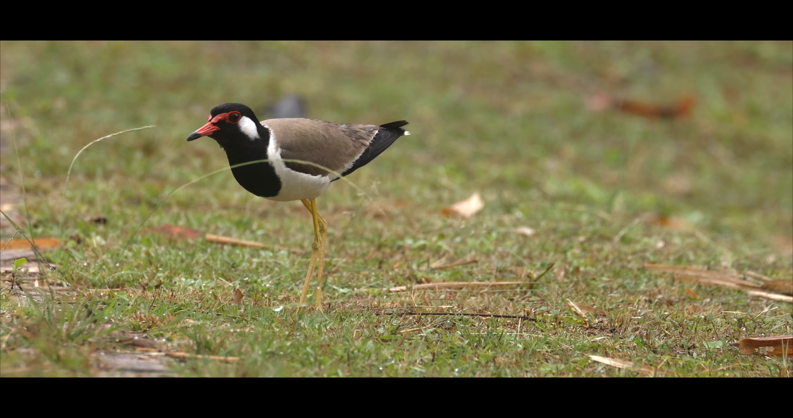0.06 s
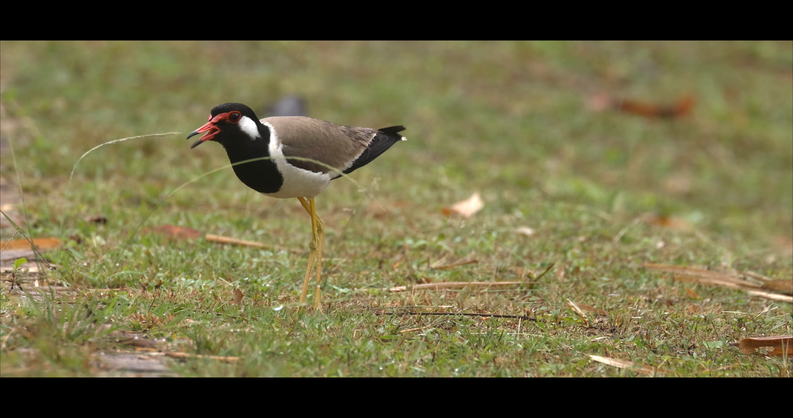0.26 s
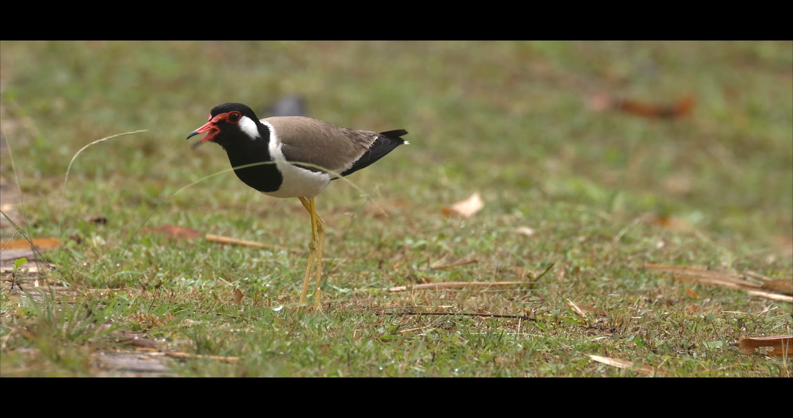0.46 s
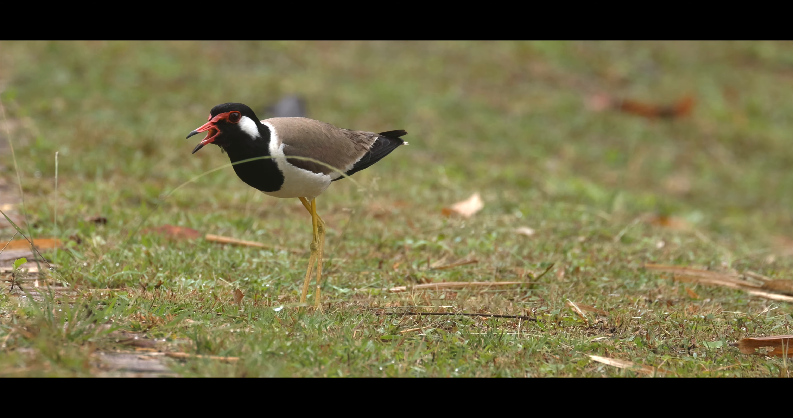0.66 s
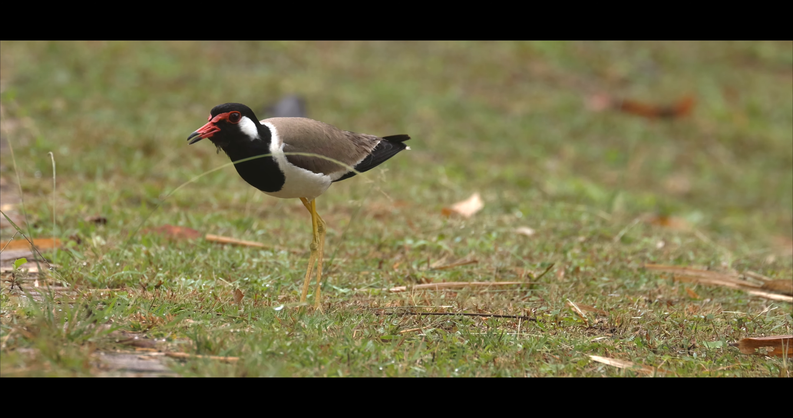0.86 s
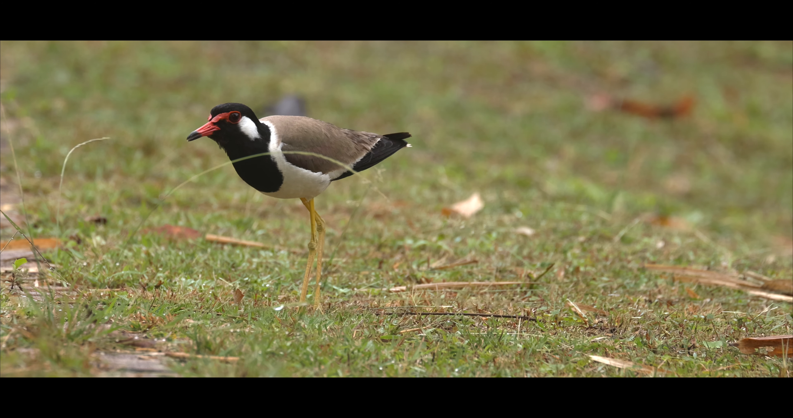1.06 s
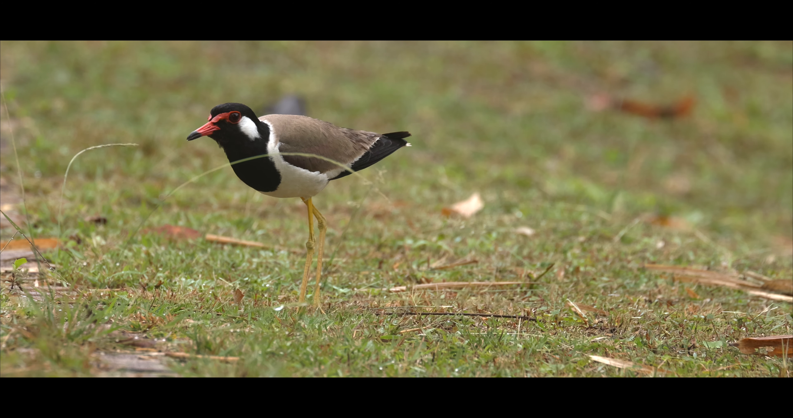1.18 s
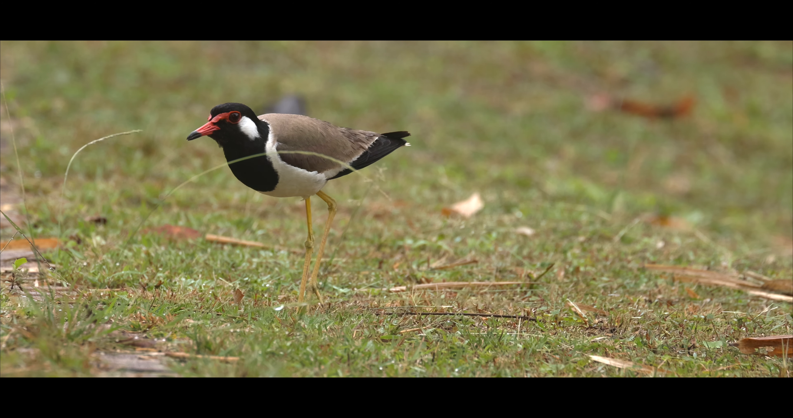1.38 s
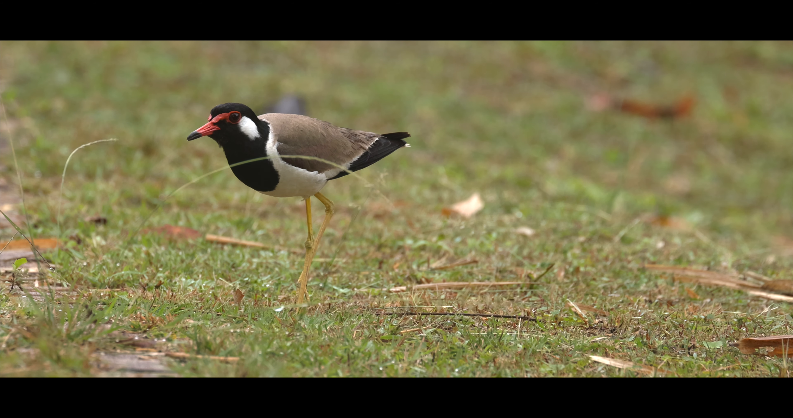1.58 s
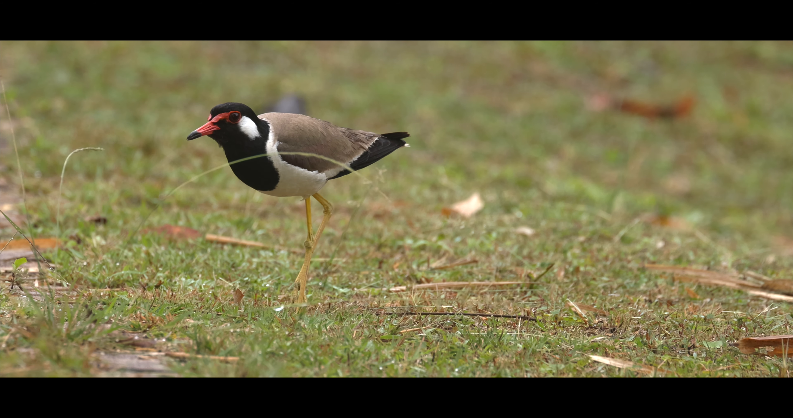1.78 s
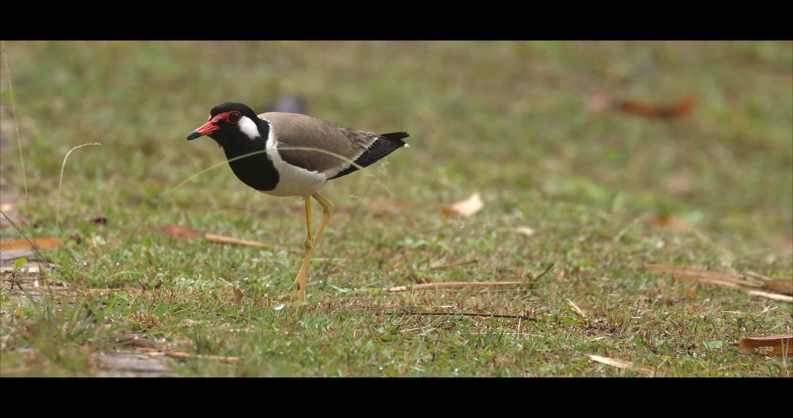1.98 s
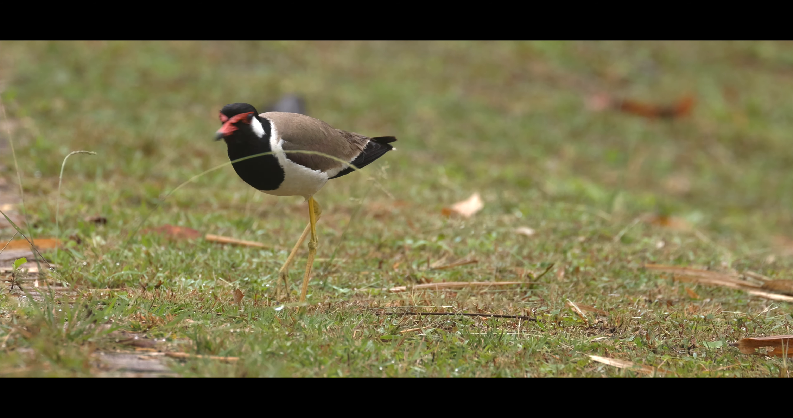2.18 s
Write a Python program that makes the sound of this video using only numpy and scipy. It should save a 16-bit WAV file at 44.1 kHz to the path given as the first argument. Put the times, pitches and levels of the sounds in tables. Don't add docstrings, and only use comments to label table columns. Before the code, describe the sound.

Lapwing alarm cries, sharp and raspy, from a near and a farther bird on a lawn

```python
import sys
import numpy as np
from scipy import signal
from scipy.fft import rfft, irfft
from scipy.io import wavfile
from scipy.ndimage import uniform_filter1d

SR = 44100
rng = np.random.default_rng(int(sys.argv[2]) if len(sys.argv) > 2 else 0)


def volts_from_db(level):
    exponent = np.asarray(level, float) / 20
    return 10 ** exponent


def file_out(sig):
    cols = np.atleast_2d(sig).T
    lim = np.clip(cols, -1, 1)
    pcm = np.round(lim * 32767).astype(np.int16)
    wavfile.write(sys.argv[1], SR, pcm)


N = 99225
LEAD = SR // 3
TIME = (np.arange(N + LEAD) - LEAD) / SR

# (time [s], pitch [Hz], level [dB], brightness [dB per octave])
NEAR_CHIPS = [
    [(.502, 1387, -31.5, 4), (.512, 1433, -25.5, 1.5), (.524, 1450, -23, 0.5), (.538, 1388, -25, 2.5),
     (.55, 1228, -33, 7.5), (.561, 1125, -37.5, 6)],
    [(.849, 1416, -27, -1), (.866, 1483, -24.5, 1.5), (.88, 1437, -24.5, -1.5), (.892, 1313, -29.5, 2.5),
     (.904, 1184, -32, 3)],
]
NEAR_SOFT_CRY = [
    (1.24, 1264, -36.5, -1.5),
    (1.254, 1259, -37.5, -2.5),
    (1.259, 1215, -37, -1),
]
NEAR_TRILL_END = [
    (1.4497, 1375, -22.5, 0.0066),
    (1.455, 1391, -23, .01),
    (1.466, 1387, -23.5, 0.027),
    (1.48, 1346, -22.5, 0.014),
    (1.487, 1270, -29.5, 0),
]
NEAR_LONG_CRY = [
    (1.653, 1336, -22, -1),
    (1.698, 1360, -22, -2),
    (1.736, 1363, -22, -1.5),
    (1.762, 1325, -22.5, -1.5),
    (1.773, 1302, -28.5, -0.5),
    (1.807, 1178, -25, -6.5),
    (1.84, 1028, -29, -24),
    (1.86, 996, -37, -6),
    (1.893, 1030, -34.5, -10),
]
NEAR_UPTURN = [
    (1.896, 1191, -41, -6),
    (1.899, 1217, -36, -10),
    (1.925, 1350, -36, -1.5),
    (1.948, 1582, -34.5, .1),
    (1.954, 1567, -37, 0),
    (1.96, 1390, -57, -10),
]
# (time [s], length [s], pitch [Hz], level [dB])
NEAR_STUTTER_PULSES = [(1.2113, 0.0094, 1309, -35.5), (1.2277, .011, 1320, -34),
                       (1.3527, 0.0037, 1300, -28.5), (1.3664, 0.01, 1354, -24.5),
                       (1.3833, 0.01, 1374, -22.5), (1.4003, 0.012, 1376, -22.5),
                       (1.4179, 0.011, 1389, -21), (1.4352, 0.012, 1390, -21),
                       (1.5877, 0.0058, 1272, -33.5), (1.6035, 0.013, 1332, -24.5),
                       (1.6205, 0.012, 1354, -23.5), (1.6374, 0.011, 1354, -21)]
NEAR_FULL_VOICE = [-25.5, -2.5, -7, -7.5, -15, -27, -32.5, -31.5, -33, -37, -31.5]
NEAR_CHIP_VOICE = [
    [-25, 1, -2.5, -7, -10, -27, -32, -29, -36, -30, -25],
    [-20, -5, -6, -11, -17, -30, -36, -32, -33, -29, -26],
]
NEAR_SOFT_VOICE = [-16.5, 0.5, 4, 0, -8, -24, -28, -25, -22.5, -28, -26.5]
NEAR_UPTURN_VOICE = [
    [-8, .1, -4, -30, -40, -35, -39, -23, -37, -32, -46],
    [-14.5, 0.095, -13, -31, -34, -42, -42, -24, -34, -33, -40],
]


def near_lapwing():
    pulses = [pulse(*p) for p in NEAR_STUTTER_PULSES]
    soft = pulses[:2] + [NEAR_SOFT_CRY, pulses[8]]
    full = pulses[2:8] + pulses[9:] + [NEAR_TRILL_END, NEAR_LONG_CRY]
    parts = [
        (NEAR_CHIPS, NEAR_CHIP_VOICE),
        (soft, NEAR_SOFT_VOICE),
        (full, NEAR_FULL_VOICE),
        ([NEAR_UPTURN], NEAR_UPTURN_VOICE),
    ]
    return syrinx(parts, shimmer_db=.6, breath_db=-30)


# (time [s], pitch [Hz], level [dB], brightness [dB per octave])
FAR_CHIPS = [
    [(.199, 1336, -41.5, 0.5), (.212, 1339, -39.5, -0.3), (.22, 1291, -42.5, -4), (.229, 1206, -39.5, -4.5),
     (.237, 1125, -44, -8)],
    [(.369, 1340, -38, -1), (.38, 1332, -40, 0.2), (.391, 1315, -41, 2), (.399, 1220, -42, -2)],
]
FAR_MID_CRY = [
    (.497, 1395, -39, 0),
    (.525, 1389, -40, -4),
    (.547, 1385, -43, 0),
]
FAR_LONG_CRY = [
    (.653, 1374, -35.5, 3.5),
    (.675, 1374, -36.5, 4),
    (.705, 1370, -32, 1),
    (0.736, 1367, -30.5, -3.5),
    (0.757, 1350, -33.5, -2.5),
    (0.79, 1321, -35, 0.5),
    (0.815, 1260, -31, -1),
    (0.851, 1140, -33.5, -1),
    (0.887, 1039, -35.5, 4),
    (0.914, 1060, -31.5, -10),
]
FAR_UPTURN = [
    (.919, 1300, -44, 0),
    (.924, 1450, -38, 0),
    (.933, 1495, -36.5, 0),
    (.942, 1500, -40, 0),
]
FAR_EARLIER_CRY = [
    (-.3, 1336, -34, 0),
    (-.15, 1367, -31.5, 0),
    (-.06, 1038, -39.5, 0),
    (-.01, 968, -38.5, 0.0049),
]
FAR_FULL_VOICE = [-7, 0.1, -15, -.6, -18, -24, -31, -26, -39, -38, -29, -40, -42]
FAR_SAGGED_VOICE = [-12.5, -0.3, -13.5, -16.5, -13, -16, -36, -46, -52, -31, -28, -35, -35]
FAR_CHIP_VOICE = [-.6, 0, -4, 1, -3, -7, -17, -21, -27, -27, -38]
FAR_ROUGH_VOICE = [-4, 0, -3, -3, -13, -15, -30, -36, -28, -17, -18]
FAR_STUTTER_VOICE = [0, 0, -15, 2, -5, -10, -20, -28, -16, -19, -15]
FAR_UPTURN_VOICE = [0, -15, -18, -24, -28, -34, -34, -25, -34, -34, -38]
# (time [s], length [s], pitch [Hz], level [dB])
FAR_STUTTER_PULSES = [
    (0.356, 0.0071, 1263, -41.5),
    (0.4692, 0.0076, 1336, -46),
    (0.481, 0.015, 1392, -39),
    (0.628, 0.0066, 1360, -47),
    (0.6395, 0.0087, 1374, -39),
]


def far_lapwing():
    pulses = [pulse(*p) for p in FAR_STUTTER_PULSES]
    parts = [
        (FAR_CHIPS[:1], FAR_CHIP_VOICE),
        (FAR_CHIPS[1:] + pulses[:1], FAR_ROUGH_VOICE),
        (pulses[1:] + [FAR_MID_CRY], FAR_STUTTER_VOICE),
        ([FAR_LONG_CRY, FAR_EARLIER_CRY], [FAR_FULL_VOICE, FAR_SAGGED_VOICE]),
        ([FAR_UPTURN], FAR_UPTURN_VOICE),
    ]
    return syrinx(parts, shimmer_db=1.2, breath_db=-27) + far_hiss()


def far_hiss():
    decay_s = .004
    gate = sum((TIME > s) * np.exp(-np.abs(TIME - s) / decay_s) for s, *_ in FAR_STUTTER_PULSES)
    high_pass = signal.butter(4, 11500, "high", fs=SR)
    return volts_from_db(-55) * gate * signal.lfilter(*high_pass, rng.standard_normal(len(TIME)))


ATTACK_S, RELEASE_S = .001, .003


def pulse(start, length, hz, db):
    scoop, scoop_s, rise_db, sag_db = .03, .003, 5, 4
    end = start + max(length - RELEASE_S / 2, scoop_s + ATTACK_S / 2)
    return [(start, hz * (1 - scoop), db - rise_db, 0),
            (start + scoop_s, hz, db, 0),
            (end, hz, db - sag_db, 0)]


# (frequency [Hz], width [Hz], level [dB])
THROAT_NOTCHES = [
    (6230, 350, -14),
    (8830, 200, -12),
]
WAVER = .002
RASP_DB, RASP_S = 13, .002
SAG_OCT = .17
SHORT_S, SLACK_DB = .1, -55
SPREAD_RAD = .11


def syrinx(parts, shimmer_db, breath_db):
    out = np.zeros(len(TIME))
    waver = 1 + WAVER * walk(150)
    shimmer = []
    for k in range(1, 14):
        flicker = volts_from_db(shimmer_db * np.sqrt(k / 2) * walk(120))
        breath = volts_from_db(breath_db) * k * walk(1500)
        shimmer.append((flicker, breath))
    for cry, voice in ((cry, voice) for cries, voice in parts for cry in cries):
        s, hz, db, tilt = np.array(cry, float).T
        end = s[-1] + RELEASE_S
        on = (TIME > s[0]) & (TIME < end)
        t = TIME[on]
        edge = np.clip((t - s[0]) / ATTACK_S, 0, 1) * np.clip((end - t) / RELEASE_S, 0, 1)

        def bend(values):
            return uniform_filter1d(np.interp(t, s, values), len(t) // 12 + 1, mode="nearest")

        pitch = bend(hz) * waver[on]
        phase = 2 * np.pi * np.cumsum(pitch) / SR
        level_db, brightness = np.interp(t, s, db), bend(tilt)
        sag_oct = np.log2(pitch.max() / pitch) * (t > s[1])
        sag = np.clip(sag_oct / SAG_OCT, 0, 1)
        is_short = s[-1] - s[0] < SHORT_S
        rasp = 1 + volts_from_db(RASP_DB) * np.exp(-(t - s[0]) / RASP_S)
        held, slack = np.broadcast_to(voice, (2, np.shape(voice)[-1]))
        for k, (held_db, slack_db, (flicker, breath)) in enumerate(zip(held, slack, shimmer), 1):
            voice_db = held_db + (slack_db - held_db) * sag
            notch_db = sum(depth * np.exp(-((k * pitch - at) / width) ** 2)
                           for at, width, depth in THROAT_NOTCHES)
            dim_db = SLACK_DB * sag_oct * np.log2(max(k / 4, 1)) * is_short
            tilt_db = brightness * np.log2(max(k / 2, 1))
            gain = volts_from_db(level_db + voice_db + notch_db + dim_db + tilt_db) * flicker[on]
            gain = gain * (1 + breath[on] * rasp)
            out[on] += np.sqrt(2) * edge * gain * np.cos(k * phase + SPREAD_RAD * k * k)
    return out


# (delay [s], level [dB])
NEAR_ECHOES = [
    (0.041, -17.5),
    (.058, -33),
    (0.096, -30),
]
FAR_BIRD_ECHOES = [
    (.017, -8),
    (.026, -12.5),
    (.046, -16),
]


def garden(x, echoes, wet_db):
    t60_s, rise_s, top_hz, low_hz = .76, .015, 10900, 1930
    t = np.arange(SR) / SR
    clumps_db = 0.45 * rng.standard_normal(SR // 200 + 1).repeat(200)[:SR]
    tail = rng.standard_normal(SR) * volts_from_db(clumps_db)
    tail = signal.lfilter(*signal.butter(1, top_hz, fs=SR), tail)
    tail = tail * volts_from_db(-60 * t / t60_s) * (1 - np.exp(-t / rise_s))
    tail *= volts_from_db(wet_db) / np.sqrt(np.sum(tail ** 2))
    for lag, db in echoes:
        tail[int(lag * SR)] += volts_from_db(db)
    tail = signal.lfilter(*signal.butter(2, low_hz, "high", fs=SR), tail)
    return signal.fftconvolve(x, tail)[:len(x)]


# (offset [s], length [s], start pitch [Hz], end pitch
# [Hz], level [dB])
HOOT_NOTES = [
    (0.001, 0.03, 828.5, 890, -47.5),
    (0.033, 0.036, 1042, 958, -50),
]


def hoots():
    first_s, every_s = .0328, .4365
    out = np.zeros(len(TIME))
    vary_db = rng.standard_normal((6, 2))
    for n in range(6):
        for (late, length, hz0, hz1, db), v in zip(HOOT_NOTES, vary_db[n]):
            middle = first_s + n * every_s + late
            u = np.clip((TIME - middle) / length + .5, 0, 1)
            phase = 2 * np.pi * np.cumsum(hz0 + (hz1 - hz0) * u) / SR
            out += volts_from_db(db + v) * np.sqrt(2) * np.sin(np.pi * u) * np.sin(phase)
    return out


# (time [s], level [dB])
GUST_LEVEL = [(0.0, -59), (0.81, -47), (0.85, -38.5), (0.95, -45.5), (0.98, -39), (1.04, -42), (1.24, -52),
              (1.3, -48), (1.33, -63), (1.45, -43), (1.58, -60), (1.92, -37.5), (1.95, -32.5),
              (2.05, -60.5), (2.22, -55.5), (2.25, -41.5)]
# (frequency [Hz], level [dB])
WIND_COLOUR = [(20, -36), (40, -15), (62, -3), (112, -3.5), (200, -7), (390, -25.5), (650, -48.5)]
# (time [s], peak level [dB], frequency [Hz])
WIND_THUMPS = [
    (0.978, -17.5, 102),
    (1.011, -29, 129),
    (1.299, -33.5, 89),
    (1.462, -29.5, 111),
    (1.933, -34.5, 172),
    (1.957, -31.5, 128),
]


def wind():
    t = TIME[LEAD:]
    gust_db = np.interp(t, *np.array(GUST_LEVEL).T) + 1.24 * walk(30.8)[LEAD:]
    out = coloured(WIND_COLOUR) * volts_from_db(gust_db)
    for s, db, hz in WIND_THUMPS:
        cycles = (t - s) * hz
        out -= volts_from_db(db) * np.cos(2 * np.pi * cycles) * np.exp(-(cycles / .58) ** 2)
    return out


# (frequency [Hz], level [dB per Hz])
AIR_COLOUR = [(40, -7.5), (200, 2), (350, -5.5), (1000, -6), (2500, -6.5), (5500, -17.5), (8000, -22.5),
              (16000, -38)]


def air():
    return volts_from_db(-46 + 0.9 * walk(3.8)[LEAD:]) * coloured(AIR_COLOUR)


def walk(rate):
    k = int(SR / rate)
    steps = np.repeat(rng.standard_normal(len(TIME) // k + 1), k)
    return 1.22 * uniform_filter1d(uniform_filter1d(steps, k), k)[:len(TIME)]


def coloured(shape):
    hz, db = np.array(shape).T
    f = np.log(np.arange(N // 2 + 1) * SR / N + 1)
    spectrum = rfft(rng.standard_normal(N)) * volts_from_db(np.interp(f, np.log(hz), db))
    x = irfft(spectrum, N)
    return x / np.std(x)


def scene():
    near = near_lapwing()
    far = far_lapwing() + hoots()
    birds = near + far
    birds = birds + garden(near, NEAR_ECHOES, wet_db=-15.5)
    birds = birds + garden(far, FAR_BIRD_ECHOES, wet_db=-8)
    return (birds[LEAD:] + wind() + air())[None]


def band_limit(x):
    return signal.sosfilt(signal.butter(12, 16950, fs=SR, output="sos"), x)


def record(dry):
    low_pass = signal.ellip(10, .3, 70, 16000, fs=SR, output="sos")
    mix = signal.sosfilt(low_pass, dry)
    return band_limit(mix)


dry = scene()
out = record(dry)
file_out(out)
```